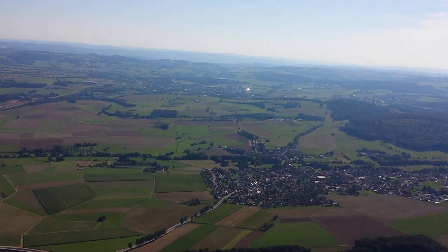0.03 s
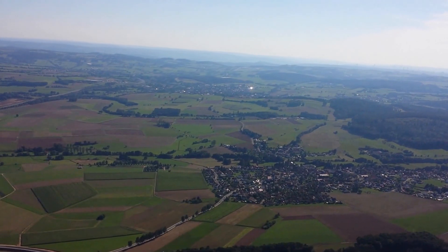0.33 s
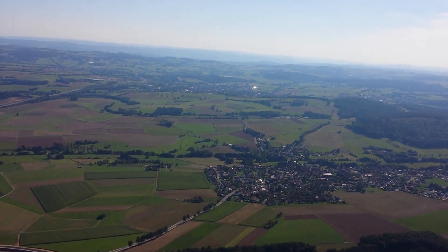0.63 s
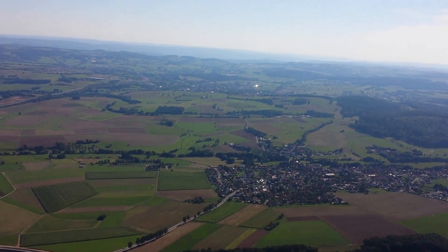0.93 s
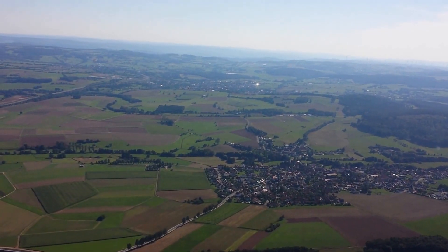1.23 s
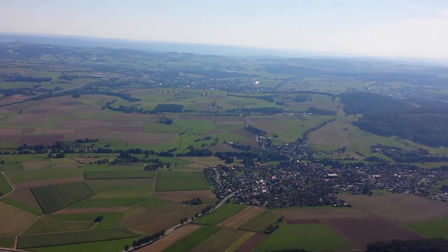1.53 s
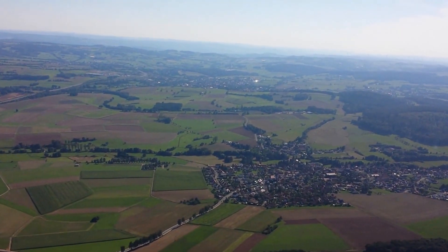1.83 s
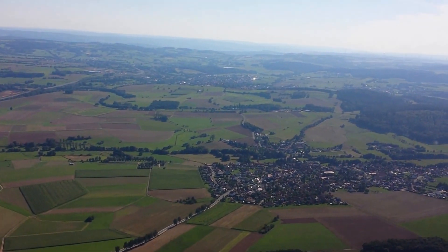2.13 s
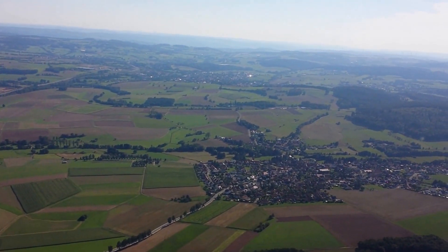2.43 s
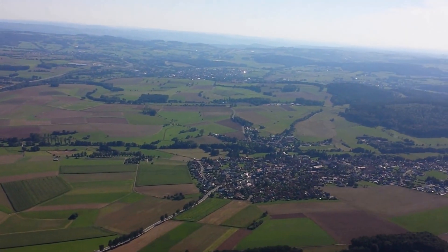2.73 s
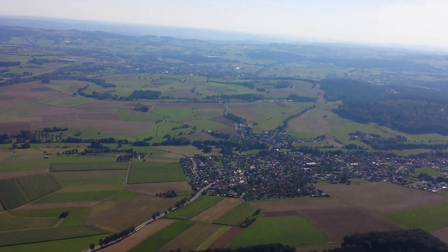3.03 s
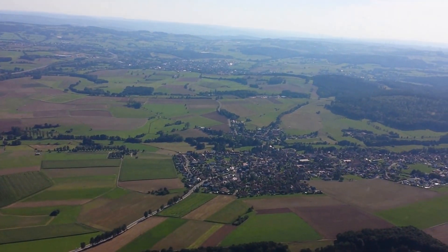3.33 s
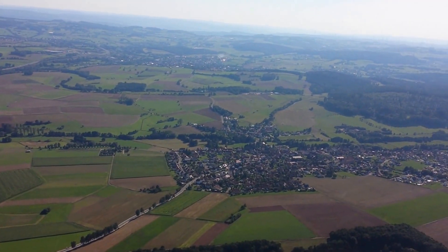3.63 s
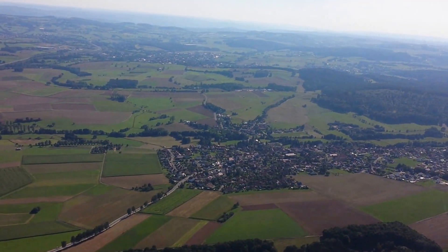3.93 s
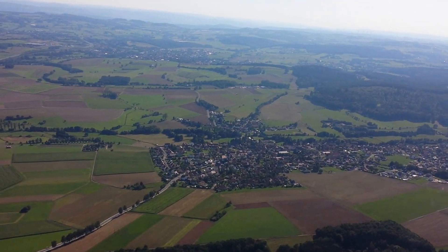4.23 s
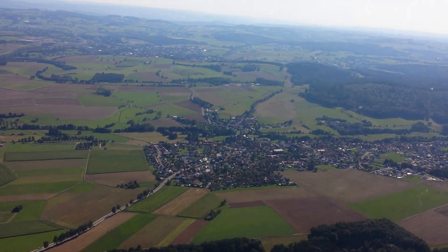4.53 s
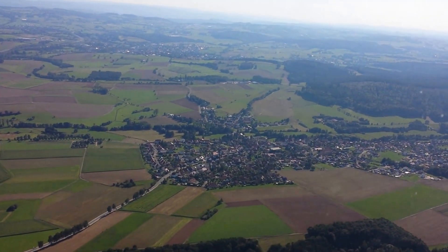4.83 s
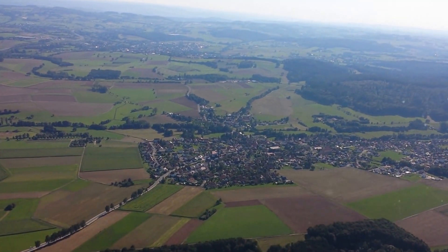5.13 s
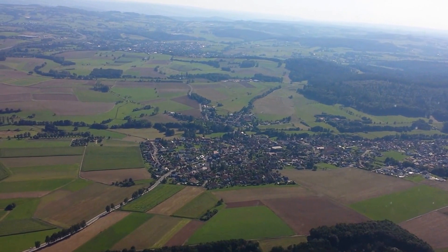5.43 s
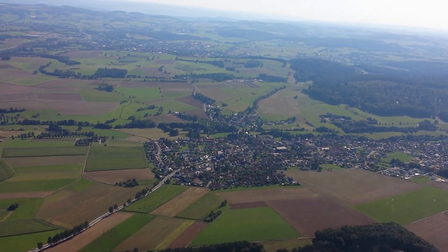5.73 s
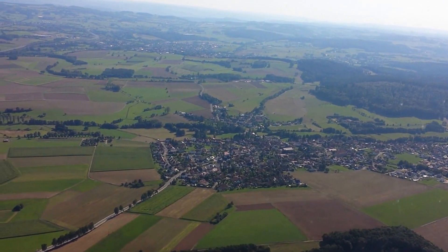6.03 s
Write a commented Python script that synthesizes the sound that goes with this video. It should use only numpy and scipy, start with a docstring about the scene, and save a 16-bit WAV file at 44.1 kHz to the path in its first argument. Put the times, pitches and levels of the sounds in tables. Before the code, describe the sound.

A loud, low piston engine drone fills a helicopter cabin, with rotor throb, air hiss and brief spells of rapid blade slapping.

```python
"""Inside a small piston helicopter in cruise, stereo microphone at the seat. From the start the
six-cylinder engine's firing note booms in the cabin, the main rotor throbs overhead and the tail rotor
buzzes behind; air rumbles on the shell and hisses round doors and vents. For the first second or so the
blades cut their own wake and slap. They do so again briefly near 2.6 s and 4.8 s, as the drone runs on."""
import sys
import numpy as np
from scipy import signal
from scipy.fft import rfft, irfft
from scipy.io import wavfile
from scipy.ndimage import uniform_filter1d, minimum_filter1d

SR = 44100
rng = np.random.default_rng(int(sys.argv[2]) if len(sys.argv) > 2 else 0)


def store_wav(level_fs):
    """Save 16-bit WAV to argv[1]."""
    pcm = np.round(np.clip(np.atleast_2d(level_fs), -1, 1) * 32767)
    wavfile.write(sys.argv[1], SR, pcm.T.astype(np.int16))


N = 276948
TIME = np.arange(N) / SR
BLADE_HZ, TAIL_HZ, CYCLE_HZ = 13.648, 81.2, 22.85  # main and tail blade passes; cycles of two crank turns


def undb(db):
    """Decibels to gain."""
    return 10 ** (np.asarray(db) / 20)


def stereo(pan_db):
    """Left and right gains for a level difference at the microphone."""
    return undb(np.array([[pan_db], [-pan_db]]) / 2)


def walk(rate_hz):
    """Smooth random drift with a spread of 1."""
    hold = max(int(SR / rate_hz), 1)
    steps = np.repeat(rng.standard_normal(N // hold + 1), hold)
    slewed = uniform_filter1d(uniform_filter1d(steps, hold), hold)[:N]
    return slewed / slewed.std()


def turns(hz, wander):
    """Cycles completed by a governed shaft that runs slightly ahead and behind."""
    return hz * TIME + wander * walk(1.192)


def partial(cycles, multiple, db, flutter_db=0, flutter_hz=1):
    """One harmonic of a shaft; turbulence shakes its level by flutter_db."""
    wave = np.sqrt(2) * np.sin(2 * np.pi * (multiple * cycles + rng.random()))
    return wave * undb(db + flutter_db * walk(flutter_hz))


# The firing note at the seat. Each row: time in seconds, level in dB.
BOOM_LEVELS = [(0, -10.5), (0.35, -14), (0.7, -11.1), (1.1, -11.5), (2.6, -10.5), (3.5, -10.5),
               (4.35, -10.0), (4.8, -12.5), (5.35, -11), (5.65, -11.0), (5.85, -10), (6.28, -10)]
# Weaker engine tones. Each row: multiple of the cycle rate, relative level in dB, left minus right in dB.
ENGINE_ORDERS = [(2, -41.5, 0), (4, -39.5, 9), (5, -41.5, 2), (7, -31, -2), (10, -36, -1), (12, -36, 4.5),
                 (14, -38.5, 3), (15, -38, -2), (16, -39, -6.5), (17, -35.5, 3), (18, -34, -1.5),
                 (19, -36, 1), (20, -37, -5)]

def engine():
    """Six firings a cycle boom through the cabin; unequal cylinders add the orders around that note."""
    cycles = turns(CYCLE_HZ, wander=0.0074)
    boom_db = np.interp(TIME, *np.transpose(BOOM_LEVELS))
    boom = partial(cycles, 6, boom_db) * stereo(-1.4)
    orders = sum(partial(cycles, k, db, flutter_db=2.1, flutter_hz=7.9) * stereo(pan_db)
                 for k, db, pan_db in ENGINE_ORDERS)
    return boom * undb(0.27 * walk(14)) + orders * undb(1.0)


# Main and tail rotor tones. Each row: multiple of that rotor's blade rate, level in dB.
THROB_HARMONICS = [(3, -44), (4, -32), (5, -31.5), (6, -30), (7, -34), (8, -32), (9, -63), (11, -42)]
BUZZ_HARMONICS = [(1, -31.5), (2, -29.5), (3, -48), (4, -37.5)]

def rotors():
    """Pressure waves of passing blades: a deep throb just overhead, a buzz from the far end of the tail."""
    main, tail = turns(BLADE_HZ, wander=0.0031), turns(TAIL_HZ, wander=0.042)
    throb = sum(partial(main, k, db, flutter_db=1.0, flutter_hz=5.8) for k, db in THROB_HARMONICS)
    buzz = sum(partial(tail, k, db, flutter_db=-0.3, flutter_hz=7.3) for k, db in BUZZ_HARMONICS)
    return throb * stereo(-0.4) + buzz


# Air noise across the microphone's two sides. Each row: frequency in Hz, left-right correlation.
AIR_LIKENESS = [(60, 1), (140, 0.92), (290, 0.92), (640, 0.56), (1400, -0.46), (3000, 0.065),
                (7000, -0.052)]

def airflow(spectrum, eddy_db):
    """Rushing air whose octaves swell on their own; long waves reach both sides alike."""
    hz = np.maximum(np.fft.rfftfreq(N, 1 / SR), 1)
    like_hz, like = np.transpose(AIR_LIKENESS)
    like = np.interp(np.log(hz), np.log(like_hz), like)
    mid, side = rfft(rng.standard_normal((2, N)))
    pair = mid * np.sqrt((1 + like) / 2) + np.array([[1], [-1]]) * side * np.sqrt((1 - like) / 2)
    points_hz, *sides_db = np.transpose(spectrum)
    gain = undb([np.interp(np.log(hz), np.log(points_hz), db) for db in sides_db])
    skirts = np.minimum(1, np.minimum(hz / points_hz[0], points_hz[-1] / hz)) ** 8
    pair = pair * gain * skirts * np.sqrt(SR / 2)
    out = 0
    for octave in range(int(np.log2(points_hz[0])), int(np.log2(points_hz[-1])) + 2):
        band = np.maximum(0, 1 - np.abs(np.log2(hz) - octave))
        out = out + irfft(pair * band, N) * undb(eddy_db * walk(10))
    return out


# Door seals and vents near the seat.
# Each row: pitch in Hz, half-width in Hz, relative peak level in dB, left minus right in dB.
VENT_WHISTLES = [(1212, 118, -64.5, -6), (1711, 60, -71.5, 16.5), (2565, 27, -64.5, -2),
                 (2810, 217, -65.5, -1), (3880, 78, -84, 8), (4524, 52, -68.5, 13), (4820, 100, -73, 15),
                 (5394, 67, -67, 13)]

def vents():
    """Air leaking past narrow gaps rings each at its own pitch."""
    hz = np.maximum(np.fft.rfftfreq(N, 1 / SR), 1)
    out = 0
    for centre, half_width, db, pan_db in VENT_WHISTLES:
        resonance = 1 / (1 + 1j * (hz / centre - centre / hz) * centre / (2 * half_width)) ** 2
        whistle = irfft(rfft(rng.standard_normal(N)) * resonance * np.sqrt(SR / 2), N)
        out = out + stereo(pan_db) * undb(db) * whistle
    return out


# Air on the shell and in the seals. Each row: frequency in Hz, left and right base levels in dB per Hz.
RUMBLE_SPECTRUM = [(20, -68, -69), (35, -61, -57), (60, -48.5, -54), (110, -48, -44), (152, -38, -43),
                   (184, -52, -45), (260, -46.5, -48), (360, -52.5, -47), (520, -53.5, -50),
                   (659, -58, -58.5), (656, -59, -50.5), (920, -57.5, -57), (1215, -60.5, -62),
                   (1520, -62, -63.5)]
HISS_SPECTRUM = [(1986, -64.5, -65), (2350, -64.5, -63.5), (2870, -67.5, -65), (3300, -64, -63.5),
                 (4050, -64, -69), (4860, -62, -68), (5330, -62, -77), (6240, -64, -68),
                 (7330, -70.5, -70.5), (8400, -76, -71.5), (10300, -82, -77.5), (11950, -91.5, -83),
                 (14200, -89, -82.5), (15200, -109, -82)]
# Swells of the rushing air. Each row: time in seconds, level in dB, played relative to its mean.
AIR_SWELLS = [(0, -30.5), (1.1, -32.5), (1.5, -29), (2.2, -30.5), (3.45, -29.5), (4.3, -31), (5.4, -30),
              (6.28, -29.5)]

def slipstream():
    """Air buffets the shell, harder in fast air and in the wake, and hisses in through the seals."""
    air_db = np.interp(TIME, *np.transpose(AIR_SWELLS))
    swell_db = air_db - air_db.mean()
    buffet_db = -0.1 + 0.92 * swell_db + 1.4 * undb(wake(TIME))
    downwash = np.cos(2 * np.pi * BLADE_HZ * TIME)  # each blade lifts the rumble and dips the hiss
    rumble = airflow(RUMBLE_SPECTRUM, eddy_db=0.4) * undb(buffet_db + 0.5 * downwash)
    leaks = airflow(HISS_SPECTRUM, eddy_db=0.67) + vents() * undb(-1.5 + 1.54 * walk(5))
    leak_db = -0.14 + swell_db - 0.55 * downwash + 0.38 * walk(17)
    return rumble + leaks * undb(leak_db)


# Spells in the rotor's own wake.
# Each row: start and end in seconds, strength in dB, build-up and die-away in dB per second.
WAKE_SPELLS = [(0, 1.16, -3.5, 100, 82), (2.62, 2.646, -8.5, 200, 95), (4.743, 4.832, -6.5, 30, 50)]

def wake(t, sag_db_per_s=0.5):
    """Strength in dB with which the blades cut their wake: each spell builds, sags slowly and dies away."""
    spells = []
    for start, end, db, rise, fall in WAKE_SPELLS:
        before, during, after = np.maximum([start - t, t - start, t - end], 0)
        spells.append(db - rise * before - sag_db_per_s * during - fall * after)
    return np.max(spells, axis=0)


# A typical slap's paths across the cabin to the microphone.
# Each row: delay in milliseconds, crack pitch in Hz, crack width in seconds, left gain, right gain.
SLAP_PATHS = [(1.6, 443, 0.00029, 0.68, 2), (5.5, 600, 0.00056, 0.2, 0.45), (7.4, 570, 0.0008, 0.16, 0.63),
              (13.4, 370, 0.00038, .15, 0.24)]
# Cabin air modes. Each row: pitch in Hz, seconds to fall 60 dB, relative gain, left minus right in dB.
CABIN_MODES = [(270, 0.11, 0.04, 5), (333.6, 0.22, 0.13, 5), (491, 0.07, 0.1, -5)]

def blade_slaps(first_s=0.0615, scatter_db=0.7, faintest_db=-21, typical_db=-7, gain_db=2.0):
    """A blade meets a tip vortex overhead: the pressure pulse bounces round the cabin and rings its air."""
    age = np.arange(SR // 10) / SR
    out = np.zeros((2, N + len(age)))
    passes = np.arange(first_s, N / SR, 1 / BLADE_HZ)
    strengths = wake(passes) + scatter_db * rng.standard_normal(len(passes))
    for pass_s, db in zip(passes, strengths):
        if db < faintest_db:
            continue
        # a vortex that passes further from the blade gives a longer pulse: more thud, less crack
        stretch = undb(0.058 * (typical_db - db))
        slap = 0
        for delay_ms, hz, crack_s, left, right in SLAP_PATHS:
            since = (age - delay_ms / 1000) / stretch
            pulse = -np.sin(2 * np.pi * hz * since) / np.cosh(np.minimum(since / crack_s, 20))
            slap = slap + np.array([[left], [right]]) * pulse
        for hz, t60, gain, pan_db in CABIN_MODES:
            ring = np.sin(2 * np.pi * hz * age) * np.exp(-np.log(1000) * age / t60)
            slap = slap + gain * ring * stereo(pan_db) * stretch ** 2
        start = int(pass_s * SR)
        out[:, start:start + len(age)] += slap * undb(db + gain_db)
    return out[:, :N]


def scene():
    """Engine, rotors and air as they reach the seat."""
    return engine() + rotors() + blade_slaps() + slipstream()


def record(dry):
    """The camera's microphone at the seat: deepest bass blocked, highest peaks limited, top cut."""
    bass_hz, top_hz, ceiling = 22, 15450, 0.98
    sound = signal.sosfilt(signal.butter(2, bass_hz, "high", fs=SR, output="sos"), dry)
    allowed = ceiling / np.maximum(np.abs(sound).max(axis=0), ceiling)
    gain = uniform_filter1d(minimum_filter1d(allowed, size=60), size=60)
    return signal.sosfilt(signal.ellip(10, 0.2, 80, top_hz, fs=SR, output="sos"), sound * gain)


dry = scene()
out = record(dry)
store_wav(out)
```